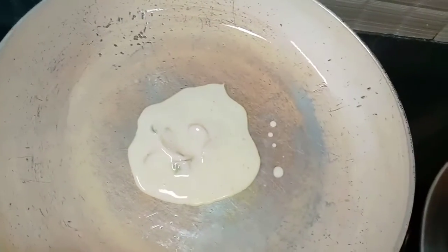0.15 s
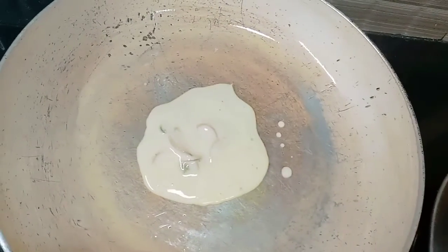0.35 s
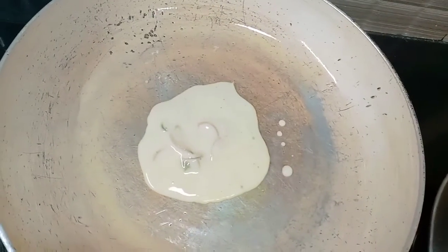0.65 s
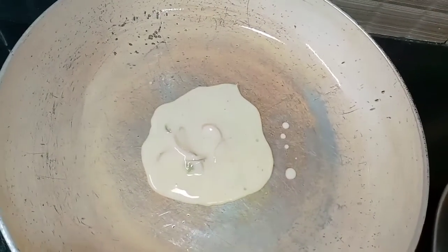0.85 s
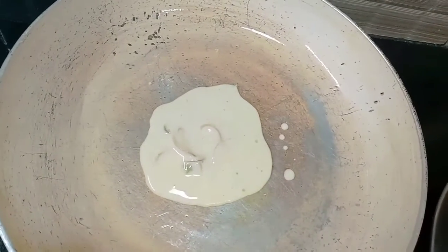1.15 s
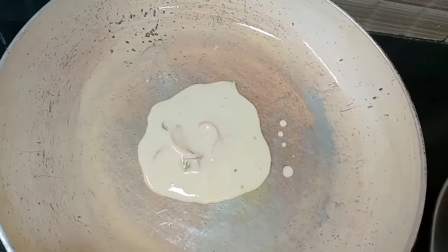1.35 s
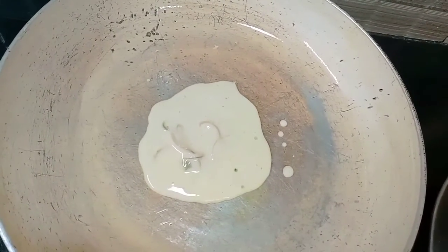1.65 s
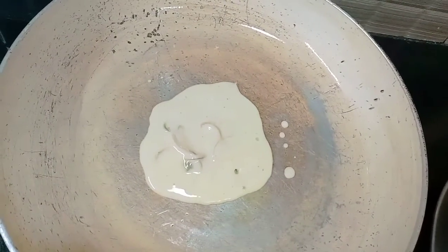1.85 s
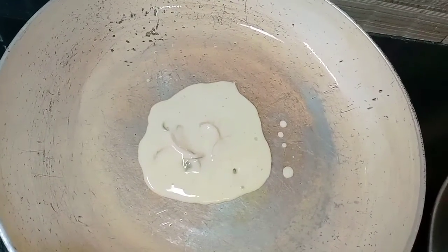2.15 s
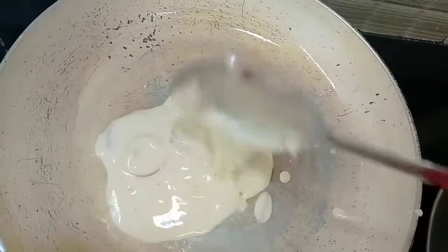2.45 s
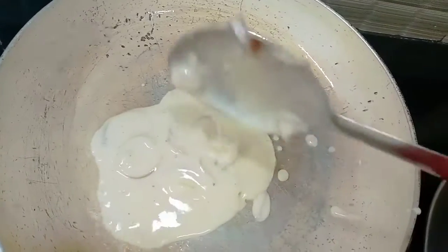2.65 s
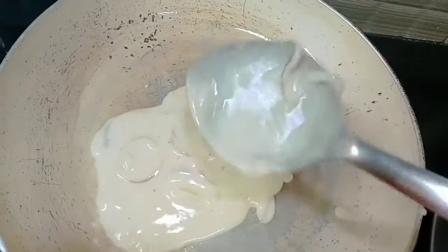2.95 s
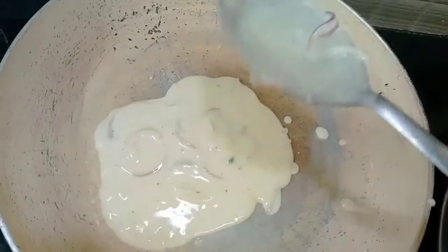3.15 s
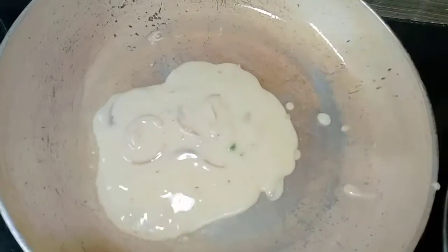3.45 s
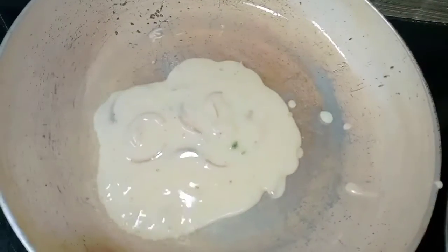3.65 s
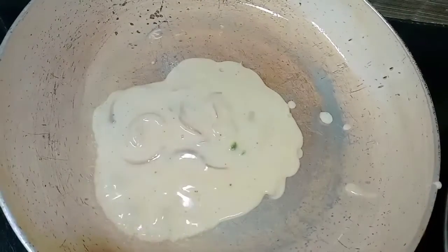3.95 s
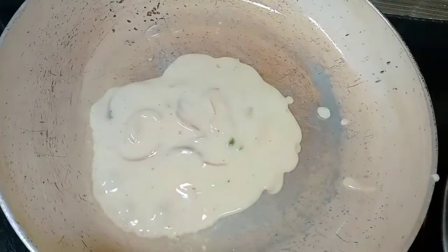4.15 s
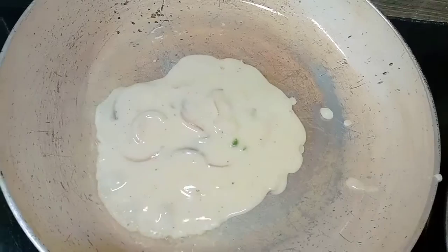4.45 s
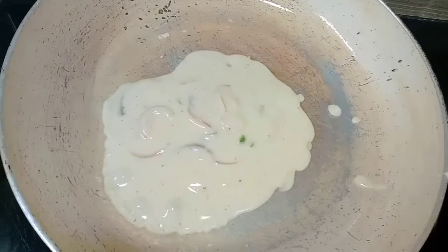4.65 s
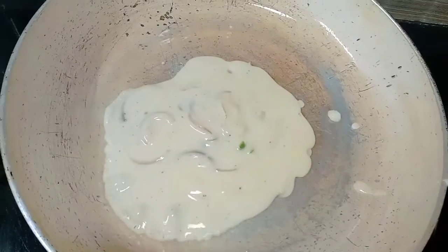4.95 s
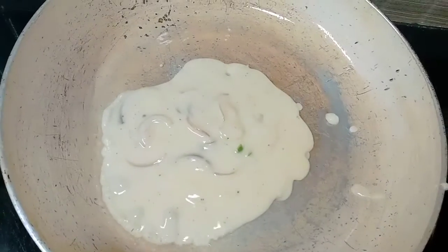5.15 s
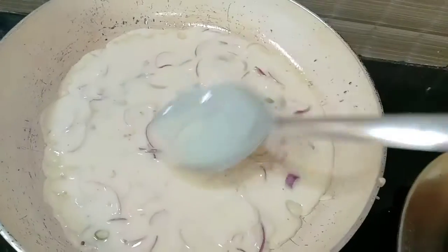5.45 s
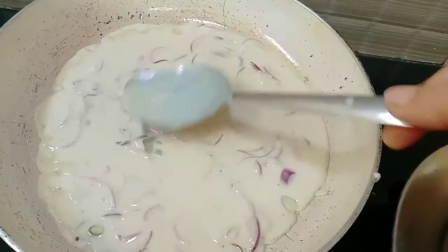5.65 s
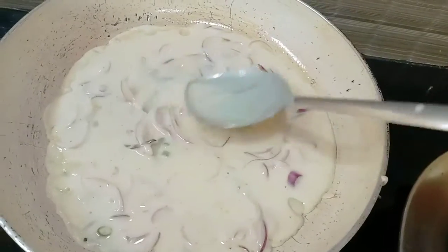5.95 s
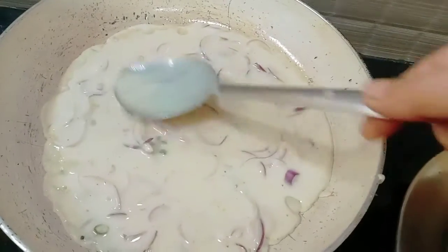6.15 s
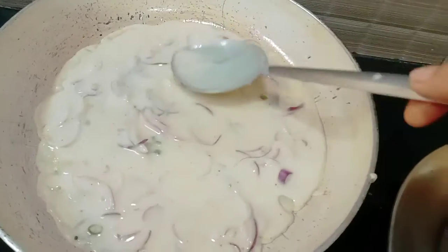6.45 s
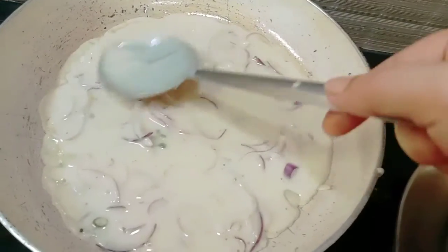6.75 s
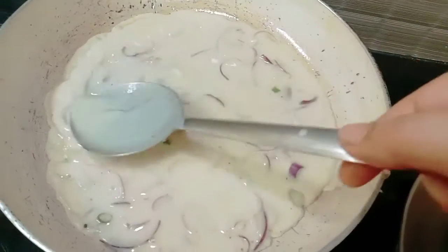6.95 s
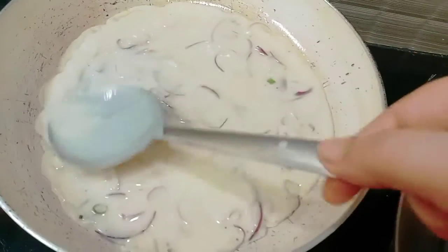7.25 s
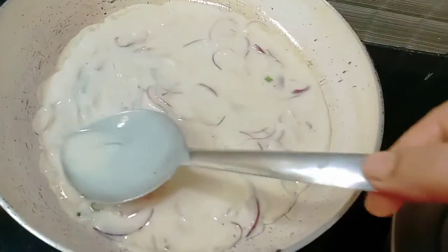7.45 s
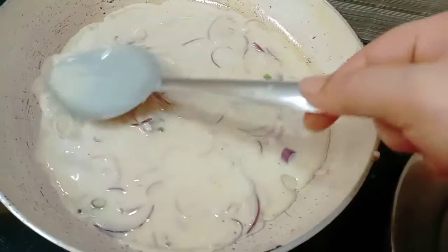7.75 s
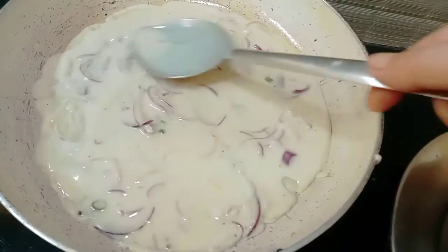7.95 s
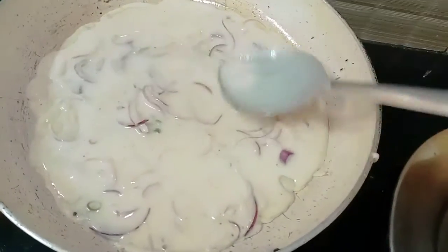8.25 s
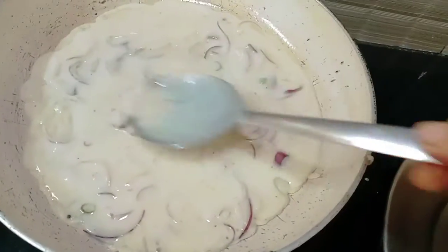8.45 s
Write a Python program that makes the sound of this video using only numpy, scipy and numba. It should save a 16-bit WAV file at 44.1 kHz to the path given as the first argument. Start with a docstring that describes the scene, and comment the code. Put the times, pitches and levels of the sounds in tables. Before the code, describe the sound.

Batter sizzles in a hot pan, a fresh spoonful flares up and fades, then a spoon softly spreads it with squelches and ticks.

```python
"""Batter sizzles in a hot frying pan, heard from close above in a small kitchen with a humming hob and fan.
The sizzle is thousands of short bursting bubbles over steam noise, coloured by the pan and the microphone.
A bowl rocks on the worktop, a second spoonful lands and flares up, and the steam slowly dies down.
After a brief near-silence a spoon spreads the batter: soft squelches, light ticks, a low rumble of
rubbing and fresh hiss where it reaches bare metal."""
import sys
import numpy as np
from scipy import signal
from scipy.fft import rfft, irfft, next_fast_len
from scipy.io import wavfile
from scipy.ndimage import uniform_filter1d
from numba import njit

SR = 44100
rng = np.random.default_rng(int(sys.argv[2]) if len(sys.argv) > 2 else 0)


def store_wav(level_fs):
    """Save 16-bit WAV to argv[1]."""
    pcm = np.round(np.clip(np.atleast_2d(level_fs), -1, 1) * 32767)
    wavfile.write(sys.argv[1], SR, pcm.T.astype(np.int16))


N = 379701
T = np.arange(N) / SR  # time in seconds

# The near-silence between pouring and spreading: start in seconds, end in seconds.
PAUSE = (5.335, 5.373)
TOP_HZ = 15550  # edge of the steep treble cut

# Kitchen air, a spectrum. Each row: frequency in Hz, gain in dB.
KITCHEN_COLOUR = [(30, -20), (55, -1.5), (75, -26), (110, 11), (170, 6.5), (260, 3.5), (360, 5.5),
                  (520, 3.5), (700, -4.5), (1000, -4), (1500, -3.5), (3000, -9.5), (7000, -39),
                  (14000, -23)]
# Mains hum of the hob, wavering about these levels.
# Each row: frequency in Hz, level while pouring in dB rms, level while spreading in dB rms.
MAINS_HUM = [(100, -67.5, -69), (198, -75, -70), (300, -69.5, -64.5)]
# Air resonances of the fan, fluttering about these levels.
# Each row: frequency in Hz, half-width in Hz, level while pouring and level while spreading in dB rms.
FAN_RESONANCES = [(101.7, 13, -69.5, -69.5), (421.7, 21, -68.5, -66.5), (785, 24, -74.5, -71),
                  (1247, 76, -63, -79)]
# A low tone near 423 Hz, set at these levels around these times. Each row: centre in seconds, level in dB rms.
LOW_TONE = [(0.1, -62), (0.283, -60), (0.45, -58.5), (0.63, -54.5), (1.62, -64), (2.04, -56.5), (3.1, -56),
            (3.38, -50), (3.88, -63), (4.15, -58), (4.98, -58.5), (5.29, -58), (5.48, -56), (6.8, -54.5),
            (7.97, -89)]
LOW_TONE_HZ, LOW_TONE_SPAN_S = 422.6, 0.049  # pitch, half-length around each time

# The bowl rocks to rest. Each row: start in seconds, level of the blow in dB before echoes.
BOWL_KNOCKS = [(1.035, -18.5), (1.046, -29.5), (1.0615, -29), (1.087, -34), (1.0987, -21), (1.127, -31),
               (1.1495, -28.5), (1.179, -41), (1.207, -43)]
# How the bowl rings. Each row: frequency in Hz, relative level in dB, t60 in seconds.
BOWL_MODES = [(225, -14, 0.023), (484, -5.5, 0.021), (620, -4.5, 0.065), (938, 10, 0.023),
              (1065, 4.5, .018), (1200, -4, 0.043), (1610, -6, 0.042), (2120, -0.5, 0.034),
              (2250, -1, 0.04), (2530, 0, 0.012), (2820, -10, 0.014), (3130, -11, 0.038), (3420, -17, .07)]
# How the room answers the bowl. Each row: frequency in Hz, gain in dB.
ROOM_COLOUR = [(900, -2.0), (2200, -5.0), (3300, 5)]

# Light touches of the spoon, dull through batter and bright on bare metal.
# Each row: start in seconds, level in dB before echoes, tilt in dB per octave.
SPOON_TICKS = [(5.507, -35, -15), (5.7661, -33, -4), (5.8544, -44, 3), (6.02, -34.5, -1),
               (6.396, -32.5, -4), (7.021, -33, 7), (7.166, -36, 1), (7.3432, -32.5, -14),
               (7.866, -22.5, 6), (7.9203, -22, 8)]
# How the spoon rings, damped by batter. Each row: frequency in Hz, relative level in dB, t60 in seconds.
SPOON_MODES = [(1290, 0, 0.011), (1830, 2.5, 0.0066), (2530, 8, 0.0079), (3600, 6.5, 0.012),
               (4800, 12, 0.0028), (7500, 5.5, 0.0051)]
# Small things radiate little bass. Each row: frequency in Hz, gain in dB.
SMALL_SOURCE_BASS = [(50, -30), (130, -0.5)]

# The rumble follows the pressure of the spoon. Each row: time in seconds, level in dB rms before flutter.
RUMBLE = [(5.38, -68), (5.6, -59), (6.1, -66), (6.3, -72), (6.5, -67), (6.7, -64), (7.1, -63), (7.45, -65),
          (7.8, -61), (8.15, -67), (8.6, -63)]
RUMBLE_FLUTTER_DB = 3.5
# Colour of the rubbing. Each row: frequency in Hz, gain in dB.
RUMBLE_COLOUR = [(70, -38), (140, -9.0), (190, 2.0), (260, 4.5), (340, -7.0), (480, -10.5),
                 (560, 0.5), (660, -7.5), (785, 5.5), (900, -17), (1400, -34)]

# Short clusters of bubbles: wet plops and, near 4 kHz, crackles of the frying.
# Each row: start in seconds, length in seconds, level of one bubble in dB before echoes, centre pitch in Hz.
BUBBLE_CLUSTERS = [(0.72, 0.031, -41, 1500), (0.722, 0.033, -46, 3000), (3.35, 0.033, -31, 4200),
                   (3.515, 0.014, -32, 4000), (3.73, 0.027, -31, 4200), (3.985, 0.036, -33, 4000),
                   (4.462, 0.017, -40, 2050), (4.474, 0.018, -45.5, 1310), (4.519, 0.033, -50, 1250),
                   (4.568, 0.0071, -39, 3020), (4.58, 0.04, -46, 2600), (6.947, 0.015, -49, 1400),
                   (7.262, 0.074, -52.5, 1350), (7.345, 0.053, -51, 1300)]
# Dull gulps of thick batter. Each row: start in seconds, peak level in dB before echoes, pitch in Hz.
GULPS = [(0.775, -56, 189), (2.331, -50, 225), (2.368, -56, 144), (2.468, -50, 151), (2.521, -57, 228),
         (3.308, -49, 268), (4.478, -52, 337), (4.483, -56, 900), (4.52, -45, 950), (4.542, -44, 890),
         (5.431, -68, 215), (5.575, -61, 150), (5.621, -62, 267), (5.72, -53, 300), (6.079, -58, 308),
         (6.135, -60, 430), (6.17, -62, 150), (6.75, -59, 248), (6.921, -56, 435), (7.469, -58, 348),
         (7.81, -55.5, 190)]

# Droplets that spit. Each row: start in seconds, level in dB before echoes.
SPITS = [(0.735, -26), (0.7657, -24), (0.9014, -20.5), (1.2161, -28), (1.3614, -24), (1.5818, -19.5),
         (4.2054, -23.5), (4.407, -25), (4.6134, -25), (5.1574, -35), (5.279, -20), (6.745, -34),
         (6.8907, -31), (6.9044, -40), (7.1656, -32.5), (7.8662, -25), (7.9035, -37)]
# The bright snap of a droplet. Each row: frequency in Hz, relative level in dB, t60 in seconds.
SPIT_MODES = [(3800, 3, 0.00082), (5430, -5, 0.0056), (7600, 4.0, 0.0038),
              (8500, 4.5, 0.007), (11000, -1, 0.0033), (14900, -3, 0.0036)]

# Blubbering under the fresh spoonful, a first rush and a lingering rest.
# Each holds: steady time in seconds, level in dB, fade in dB per second.
BLUBBER_RUSH, BLUBBER_REST = (0.2, -43.5, 46), (0.73, -58, 4.7)
# Colour of the big steam bubbles. Each row: frequency in Hz, gain in dB.
BLUBBER_COLOUR = [(50, -45), (110, -1), (160, 0.0), (280, -6.5), (400, 11.0),
                  (520, 5.5), (640, -1.0), (780, 6), (1100, 5)]
# Bass cut on the ringing air of the rush. Each row: frequency in Hz, gain in dB.
BLUBBER_RING_COLOUR = [(100, -41.5), (900, 0)]

# Two bands of hiss that climb.
# Each row: time in seconds, upper band in Hz, its level in dB rms, lower band in Hz, its level in dB rms.
CLIMBS = [(4.85, 3300, -64, 2400, -66), (4.93, 4400, -44, 2800, -57), (4.98, 5250, -43, 3050, -50),
          (5.06, 6300, -50, 3450, -51), (5.16, 7200, -51, 4200, -43), (5.25, 7400, -66, 4430, -47),
          (5.33, 7500, -70, 4660, -44)]
CLIMB_WIDTH_HZ = 940  # half-width

# Spoonfuls boil steadily, then dry out, large wet bubbles first and fine spray last.
# Each row: start in seconds, steady time in seconds, sizzle in dB, wet bubbles in dB relative to it,
# spray in dB relative to it, then the fades of these three in dB per second.
SPOONFULS = [(-0.03, 0.027, -42.5, -3, 4.6, 3.86, 5.5, 3.94),
             (2.249, 0.76, -33.5, -1.5, 0.19, 4.1, 7.8, 3.15)]
# Steam escapes from under the edge of the batter. Each row: start in seconds, length in seconds,
# sizzle in dB, wet bubbles in dB relative to it, spray in dB relative to it.
FLARES = [(-0.02, 0.45, -39.5, -6, -5), (0.712, 0.05, -43, -10, -5), (2.267, 0.64, -47, 8, -15),
          (3.339, 0.041, -35.5, -5, -20), (3.444, 0.027, -39.5, -16, -10), (3.513, 0.012, -32, -10, -9),
          (3.716, 0.034, -37.5, -5, -18), (3.901, 0.03, -36.5, -1, -11), (3.975, 0.084, -38.5, -2.5, -15),
          (4.177, 0.066, -42, 0, -13), (4.56, 0.029, -43, -12, -12), (4.9, 0.23, -51, -25, 9),
          (5.138, 0.24, -42.5, -11, 3.5)]
FLARE_ATTACK_S, FLARE_RELEASE_DB_PER_S = 0.012, 237
# Strokes of the spoon, wet in thick batter and hissing on bare metal.
# Each row: start in seconds, attack in seconds, length in seconds,
# sizzle in dB, wet bubbles in dB relative to it, spray in dB relative to it.
STROKES = [(5.45, 0.061, 0.064, -68, 13.5, -7), (5.547, 0.03, 0.056, -68, 10, -3),
           (5.613, 0.023, 0.25, -61, 6, -13), (5.904, 0.038, 0.2, -62.5, 5.5, -7.5),
           (6.215, 0.039, 0.03, -79.5, 21.5, -2), (6.33, 0.028, 0.051, -55, 4.5, -7),
           (6.506, 0.057, 0.11, -48.5, -6, -1), (6.62, 0.023, 0.13, -52, -2.5, -5.5),
           (6.76, 0.04, 0.092, -56.5, 2, -1), (6.85, 0.03, 0.082, -52.5, -6, -5),
           (6.935, 0.021, 0.19, -52.5, -0.5, -8), (7.13, 0.04, 0.13, -58.5, -7, -7.5),
           (7.161, 0.004, 0.018, -55, -4, -7), (7.232, 0.026, 0.055, -52.5, -0.5, -5.5),
           (7.312, 0.023, 0.1, -54.5, -7, -10), (7.468, 0.046, 0.31, -53, -8, -7),
           (7.742, 0.1, 0.84, -45, -9, 0), (7.903, 0.018, 0.031, -45, -2, -1),
           (7.92, 0.06, 0.34, -52.5, 1, -7)]
STROKE_RELEASE_DB_PER_S, STROKE_FLUTTER_DB = 183, -0.5
SAG_DB_PER_S = 3.5  # a flare or a stroke weakens as the metal under it cools
# The spread batter between strokes: sizzle in dB, wet bubbles and spray in dB relative to it.
SIMMER = (-70, -0.56, -6)

# Broad colour of the frying as picked up, with a microphone resonance above 14 kHz.
# Each row: frequency in Hz, gain in dB.
PICKED_UP_COLOUR = [(200, -25), (620, -11), (850, -1.5), (1400, 2), (2500, 2.5), (5500, 0.5), (7400, -1),
                    (8300, -2), (10500, -5.5), (12500, -8), (13800, -15), (14600, -1), (15500, -2)]
# Peaks and hollows of the air in the pan. Each row: frequency in Hz, half-width in Hz, gain in dB.
PAN_AIR = [(1040, 144, -3.5), (1266.5, 25, 7.5), (1524, 150, 5.5), (1700, 72, -4), (2070, 130, 1),
           (1964, 77, -4), (2395, 230, -6), (3150, 76, 1), (4683, 66, 3), (5520, 1100, 2), (5870, 260, 2),
           (6260, 160, -7), (7560, 160, 1), (8030, 480, -5.5)]
# The same around the first small pool. Each row: frequency in Hz, half-width in Hz, gain in dB.
SMALL_POOL_AIR = [(650, 220, -4), (2140, 240, -0.5), (2480, 52, 2), (3750, 160, -4), (4800, 250, -2.5),
                  (5340, 110, 3), (6600, 690, -3.5), (7740, 270, 4)]
# And around the widely spread batter. Each row: frequency in Hz, half-width in Hz, gain in dB.
SPREAD_AIR = [(1484, 170, -7), (1960, 92, 6.5), (2310, 180, 3), (3100, 180, -3), (5640, 1400, -2.5),
              (7300, 530, 2.5), (9900, 600, -1), (12000, 740, -3.5), (960, 35, -9)]
# Bands used to gauge each bubble size: wet, middling, fine, mist. Each row: low edge in Hz, high edge in Hz.
SIZE_RANGES = [(900, 2400), (2700, 6200), (6800, 11000), (6800, 11000)]
# The corners in Hz between which one bubble size hands over to the next.
SIZE_CORNERS_HZ = [1900, 3100, 5800, 7400, 10500, 13000]
# Each row: the share of one bubble size at each of those corners, from 0 to 1.
SIZE_SHARES = [(1, 0, 0, 0, 0, 0), (0, 1, 1, 0, 0, 0), (0, 0, 0, 1, 1, 0), (0, 0, 0, 0, 0, 1)]

# The echo from the hand or spoon above the pan.
# Each row: time in seconds, lowest hollow in Hz, echo share from 0 to 1.
OVERHEAD_ECHO = [(4.6, 1520, 0.69), (4.85, 1510, 0.48), (4.93, 1670, 0.69), (5.0, 2090, 0.53),
                 (5.1, 2650, 0.54), (5.2, 2900, 1), (5.33, 3100, 1), (5.38, 1050, .1), (6.1, 994, 0.68),
                 (6.4, 1710, 0.16), (6.55, 2150, .2), (6.95, 2220, 0.33), (7.3, 1610, 0.11),
                 (7.55, 3130, 0.61), (7.85, 3200, 0.42), (8.05, 1610, 0.14), (8.25, 1580, 0.21),
                 (8.6, 1660, .22)]
# Colour of that echo. Each row: frequency in Hz, gain in dB.
OVERHEAD_COLOUR = [(900, -15), (1800, -2.0), (6200, -14.5), (9000, -33)]
# The air between spoon and pan rings, lower as the gap widens.
# Each row: time in seconds, centre in Hz, boost in dB.
GAP_RING = [(5.38, 3300, -2), (5.55, 3350, 9), (5.68, 3520, 8.5), (6.15, 3450, 11), (6.3, 3500, -1),
            (6.48, 3850, 4), (6.56, 3850, 5.5), (7.0, 3820, 3), (7.4, 3750, 1), (7.55, 4300, 1),
            (7.8, 4580, 6), (7.93, 4350, 8), (8.05, 3900, 7), (8.18, 3450, 3), (8.35, 3300, -1)]
# A lower band that stands out of the scrape. Each row: time in seconds, centre in Hz, boost in dB.
LOW_RING = [(5.38, 2100, 0), (5.7, 2100, 5), (6.2, 2120, 2.5), (6.39, 2560, 6), (6.56, 2800, 9),
            (6.9, 2900, 4.5), (7.2, 2800, -2), (7.32, 2370, 2), (7.6, 2700, -2), (8.0, 2580, 3.5),
            (8.38, 2530, 7.5), (8.6, 2500, -6)]
# A gliding band of the frying sound, weakened or strengthened.
# Each row: time in seconds, centre in Hz, boost in dB.
GLIDING_BAND = [(0.4, 2100, -3.5), (0.9, 2100, -4), (1.7, 2080, -2.5), (2.24, 2110, -4), (2.3, 2080, -2),
                (3.3, 2110, -1.5), (4.0, 2110, 3.5), (4.85, 2900, -4.5), (4.97, 4000, -9), (5.1, 5930, -4),
                (5.33, 6500, -6), (5.38, 2600, 2), (5.5, 2500, -4), (6.1, 2500, 1), (6.4, 2250, -9),
                (6.55, 2260, -5), (6.9, 2200, -7), (7.22, 2180, -13), (7.31, 1900, -1), (7.55, 1700, -3),
                (7.9, 1650, -8), (8.1, 1650, -1)]
# A ring near 1250 Hz in the sizzle that grows and fades.
# Each row: time in seconds, centre in Hz, boost in dB.
SIZZLE_RING = [(0, 1220, 3), (2.3, 1260, 0), (3.3, 1270, 0), (4.6, 1240, 5.5), (5.0, 1190, -13),
               (5.33, 1180, -1), (5.4, 1260, 4), (6.5, 1260, 1), (6.65, 1250, 6.5), (7.0, 1230, 4.5),
               (7.33, 1210, 8.5), (7.5, 1250, 7), (7.8, 1270, 0), (7.95, 1290, 0), (8.45, 1270, 3.5)]
GAP_WIDTH_HZ, LOW_WIDTH_HZ, GLIDING_WIDTH_HZ, SIZZLE_RING_WIDTH_HZ = 240, 280, 590, 73


def undb(db):
    """Decibels to gain."""
    return 10 ** (np.asarray(db) / 20)


def level(x, db):
    """Bring a sound to unit rms, then to a level in dB that may move."""
    return x * undb(db) / np.sqrt(np.mean(x ** 2))


def curves(rows):
    """The columns of a table, joined by straight lines in time."""
    s, *columns = np.transpose(rows)
    return [np.interp(T, s, column) for column in columns]


def shape(x, gain):
    """Filter by a gain that is a function of frequency."""
    size = next_fast_len(N + 4096)
    hz = np.arange(size // 2 + 1) * SR / size + 1  # 1 Hz up, to keep its logarithm finite
    return irfft(rfft(x, size) * gain(hz), size)[:N]


def slope(hz, points):
    """A (Hz, dB) spectrum read on a log-frequency axis."""
    f, db = np.transpose(points)
    return np.interp(np.log(hz), np.log(f), db)


def slope_gain(hz, points):
    """The gain of a (Hz, dB) spectrum."""
    return undb(slope(hz, points))


def bumps_db(hz, bumps):
    """Rounded peaks and hollows along the frequency axis."""
    return sum(db * np.exp(-((hz - f) / width) ** 2) for f, width, db in bumps)


def noise_band(hz, width_hz):
    """Noise in a rounded band about one frequency."""
    return shape(rng.standard_normal(N), lambda f: np.exp(-((f - hz) / width_hz) ** 2))


def walk(rate):
    """A smooth random wander: levels held 1 / rate seconds and slewed twice; spread near 1."""
    hold = int(SR / rate)
    steps = rng.standard_normal(1024)
    held = steps[np.arange(N) // hold % len(steps)]
    return 1.3 * uniform_filter1d(uniform_filter1d(held, hold), hold)


def delayed(x, s):
    """The sound s seconds later; s may move."""
    return np.interp(T - s, T, x)


def envelope(start, length, attack, release_db, sag_db=0):
    """A quick rise, a hold that sags and a release; both slopes in dB per second."""
    age = np.maximum(T - start, 0)
    fall_db = sag_db * np.minimum(age, length) + release_db * np.maximum(age - length, 0)
    return np.minimum(age / attack, 1) * undb(-fall_db)


@njit
def ring(start, hz, t60, size):
    """A sum of decaying sines, each with its own start, pitch, decay and size."""
    out = np.zeros(N)
    for k in range(len(start)):
        z, p = size[k] + 0j, np.exp((2j * np.pi * hz[k] - np.log(1000) / t60[k]) / SR)
        first = int(start[k] * SR)
        for i in range(first, min(N, first + int(t60[k] * SR) + 2)):
            z *= p
            out[i] += z.imag
    return out


def bubbles(rate, lo_hz, hi_hz, cycles, spread_db):
    """Bubbles burst at random, each a few cycles long; small ones snap harder, so the sum is near white."""
    chance, pitch, size = rng.random(N), rng.random(N), rng.standard_normal(N)
    at = chance < rate / SR
    hz = lo_hz * (hi_hz / lo_hz) ** pitch[at]
    # dense bubbling is made of weaker bubbles, so the rate alone does not set the level
    size = undb(spread_db * np.minimum(size[at], 2)) * hz / np.sqrt((rate + 0 * T)[at])
    sign = np.where(np.flatnonzero(at) % 2, 1, -1)
    return level(ring(T[at], hz, cycles / hz, size * sign), 0)


def strike(events, modes, scatter, tilt_db=0):
    """Every blow rings all modes of one object, slightly retuned; tilt (dB per octave) brightens it."""
    (s, db, *_), (hz, mode_db, t60) = np.transpose(events), np.transpose(modes)
    share = undb(mode_db + np.outer(tilt_db, np.log2(hz)))
    share = share / np.linalg.norm(share, axis=1, keepdims=True)
    share = share * (-1) ** np.arange(len(hz))  # neighbouring modes start in opposite directions
    pitch = hz * (1 + scatter * rng.standard_normal((len(s), len(hz))))
    size = undb(db)[:, None] * share
    return ring(np.repeat(s, len(hz)), pitch.ravel(), np.tile(t60, len(s)), size.ravel())


def echoes(x, t60, wet_db):
    """Dense reflections that begin after a millisecond and die away."""
    t = T[:SR // 2]
    tail = rng.standard_normal(len(t)) * np.exp(-np.log(1000) * t / t60) * (t > .001)
    return x + undb(wet_db) * signal.fftconvolve(x, tail / np.linalg.norm(tail))[:N]


def kitchen_air():
    """The dull background of the kitchen: shaped noise whose level drifts."""
    air = shape(rng.standard_normal(N), lambda hz: slope_gain(hz, KITCHEN_COLOUR))
    return level(air, -62.5) * undb(walk(5))


def hob_hum():
    """Mains hum: a few steady sines that waver in level and phase."""
    out = 0
    for hz, pouring_db, spreading_db in MAINS_HUM:
        db = np.where(T < PAUSE[0], pouring_db, spreading_db) + 3 * walk(14)
        out = out + undb(db) * np.sqrt(2) * np.sin(2 * np.pi * hz * T + .6 * walk(12))
    return out


def fan():
    """Air noise in narrow resonances whose levels flutter."""
    out = 0
    for hz, width_hz, pouring_db, spreading_db in FAN_RESONANCES:
        db = np.where(T < PAUSE[0], pouring_db, spreading_db) + 2.44 * walk(13)
        out = out + level(noise_band(hz, width_hz), db)
    return out


def low_tone():
    """A low tone near 423 Hz, a sine of wandering phase set at given levels around given times."""
    strength = sum(undb(db) * np.exp(-((T - s) / LOW_TONE_SPAN_S) ** 2) for s, db in LOW_TONE)
    return strength * np.sqrt(2) * np.sin(2 * np.pi * LOW_TONE_HZ * T + walk(17))


def bowl():
    """The bowl stands further off: its modes ring, echo from the worktop and wake the room."""
    tilt_db = 0.3 * (np.transpose(BOWL_KNOCKS)[1] + 22.5)  # weak knocks are duller
    knock = strike(BOWL_KNOCKS, BOWL_MODES, scatter=0.024, tilt_db=tilt_db)
    knock = knock + 0.24 * delayed(knock, 0.00225)
    reflections = echoes(knock, t60=0.39, wet_db=-0.5) - knock
    return knock + shape(reflections, lambda hz: slope_gain(hz, ROOM_COLOUR))


def spoon_ticks():
    """The spoon ticks close by: short damped modes, brighter where it meets bare metal."""
    ticks = strike(SPOON_TICKS, SPOON_MODES, scatter=0.028, tilt_db=np.transpose(SPOON_TICKS)[2])
    return echoes(ticks, t60=0.092, wet_db=-1.5)


def stirring():
    """The back of the spoon rubs through the batter with a low, fluttering rumble of slow bubbles."""
    rub = bubbles(900, 127, 825, cycles=9.4, spread_db=4.0)
    rub = shape(rub, lambda hz: slope_gain(hz, RUMBLE_COLOUR))
    pressure_db = curves(RUMBLE)[0] + RUMBLE_FLUTTER_DB * walk(22)
    return level(rub, pressure_db) * (T > PAUSE[0])


def clusters_and_gulps(count=24):
    """Quick clusters of short decaying sines for plops and crackles, one longer low sine for each gulp."""
    s, length, db, hz = np.repeat(BUBBLE_CLUSTERS, count, axis=0).T
    late, pitch = rng.random((len(s), 2)).T
    hz = hz * 2 ** (1.2 * (pitch - .5))
    clusters = ring(s + length * late, hz, 7 / hz, undb(db))
    s, db, hz = np.transpose(GULPS).copy()
    gulps = ring(s, hz, 20 / hz, undb(db))
    return echoes(clusters, t60=0.084, wet_db=1.0) + echoes(gulps, t60=0.033, wet_db=11.5)


def spits():
    """Single droplets burst with a bright snap of very short modes."""
    return echoes(strike(SPITS, SPIT_MODES, scatter=0.071), t60=0.087, wet_db=-0.5)


def blubber():
    """Big steam bubbles push through the fresh spoonful and thin out; the rush rings the air in the pan."""
    lands = SPOONFULS[-1][0]
    rush, rest = (undb(db) * envelope(lands, hold, attack=0.037, release_db=fade)
                  for hold, db, fade in (BLUBBER_RUSH, BLUBBER_REST))
    big = bubbles(500, 143, 1010, cycles=19.5, spread_db=2.5)
    big = shape(big, lambda hz: slope_gain(hz, BLUBBER_COLOUR))
    ringing = bubbles(400, 1263, 1305, cycles=50, spread_db=3.5)
    ringing = shape(ringing, lambda hz: slope_gain(hz, BLUBBER_RING_COLOUR))
    return level(big, -0.3) * (rush + rest) + undb(6.0) * ringing * rush


def climbing_hiss():
    """Two narrow bands of hiss climb in pitch together: slow noise carried on gliding sines."""
    upper_hz, upper_db, lower_hz, lower_db = curves(CLIMBS)
    out = 0
    for hz, db in ((upper_hz, upper_db), (lower_hz, lower_db)):
        noise = level(noise_band(0, CLIMB_WIDTH_HZ), 0)
        out = out + undb(db) * noise * np.sqrt(2) * np.sin(2 * np.pi * np.cumsum(hz) / SR)
    return out * (T > CLIMBS[0][0]) * (T < PAUSE[0])


def boiling():
    """Spoonfuls, flares and strokes add their power: sizzle in dB, wet bubbles and spray relative to it."""
    def power(db, wet_db, spray_db):
        """Power of the sizzle, the wet bubbles and the spray, one row each."""
        return undb(db + np.array([[0], [wet_db], [spray_db]])) ** 2
    poured, flares, strokes = 0, 0, 0
    for s, hold, db, wet_db, spray_db, *fades in SPOONFULS:
        drying = np.array([envelope(s, hold, attack=0.0071, release_db=fade) for fade in fades])
        poured = poured + power(db, wet_db, spray_db) * drying ** 2
    for s, length, db, wet_db, spray_db in FLARES:
        burst = envelope(s, length, FLARE_ATTACK_S, FLARE_RELEASE_DB_PER_S, SAG_DB_PER_S)
        flares = flares + power(db, wet_db, spray_db) * burst ** 2
    for s, attack, length, db, wet_db, spray_db in STROKES:
        burst = envelope(s, length, attack, STROKE_RELEASE_DB_PER_S, SAG_DB_PER_S)
        strokes = strokes + power(db, wet_db, spray_db) * burst ** 2
    strokes = strokes * undb(STROKE_FLUTTER_DB * walk(30)) ** 2
    total = np.where(T < np.mean(PAUSE), poured + flares, power(*SIMMER) + strokes)
    db, wet, spray = 10 * np.log10(total)
    return db, wet - db, spray - db


def wandering_spots(rate, spread_db, wander_db, count=4):
    """Patches of the pan boil in turn and creep about, so their echoes from the rim colour them differently."""
    out = 0
    for _ in range(count):
        steam = undb(-2.0) * rng.standard_normal(N)
        spot = bubbles(rate / count, 440, 16900, cycles=4.2, spread_db=3.5) + steam
        near_s, far_s = .0007 + .00015 * walk(5), .0022 + .0003 * walk(4)
        spot = spot + .5 * delayed(spot, near_s)
        spot = spot - .5 * delayed(spot, far_s)
        out = out + spot * undb(wander_db * walk(5) + spread_db * walk(90))
    # the heat that the patches share stays the same
    return out / np.sqrt(uniform_filter1d(out ** 2, size=4096))


def pickup_gain(hz):
    """The broad colour of the frying as picked up, with the peaks and hollows of the pan."""
    return undb(slope(hz, PICKED_UP_COLOUR) + bumps_db(hz, PAN_AIR))


def pool_colour(x):
    """The first small pool and the widely spread batter each have a colour of their own."""
    small, spread = (shape(x, lambda hz: undb(bumps_db(hz, air))) for air in (SMALL_POOL_AIR, SPREAD_AIR))
    return np.select([T < SPOONFULS[-1][0], T > np.mean(PAUSE)], [small, spread], x)


def passing_reflection(x):
    """A hand or spoon over the pan sends back a dull echo; the closer it comes, the higher the hollows."""
    hollow_hz, share = curves(OVERHEAD_ECHO)
    dull = shape(x, lambda hz: slope_gain(hz, OVERHEAD_COLOUR))
    return (x - share * delayed(dull, 1 / hollow_hz)) * undb(-2.5 * share)


def moving_bands(x):
    """Four narrow bands of the frying sound are weakened or strengthened as their centres glide."""
    for rows, width_hz in ((GAP_RING, GAP_WIDTH_HZ), (LOW_RING, LOW_WIDTH_HZ),
                           (GLIDING_BAND, GLIDING_WIDTH_HZ), (SIZZLE_RING, SIZZLE_RING_WIDTH_HZ)):
        hz, boost_db = curves(rows)
        turn, pole = np.exp(2j * np.pi * np.cumsum(hz) / SR), np.exp(-np.pi * width_hz / SR)
        # shift the gliding centre down to 0 Hz, smooth there, and shift it back
        slow = signal.lfilter([1 - pole], [1, -pole], x * turn.conj())
        band = 2 * np.real(turn * slow)
        x = x + (undb(boost_db) - 1) * band
    return x


def sizzle():
    """Bursting bubbles over a hiss of steam: sparse crackles when quiet, a dense rush when loud."""
    db, wet_db, spray_db = boiling()
    rate = np.minimum(2500 + 5500 * undb(.8 * (db + 45)), SR / 2)  # bubbles per second
    # the quieter the pan, the more a single patch stands out
    fry = wandering_spots(rate, spread_db=0.96, wander_db=np.interp(db, [-52, -36], [8, 3]))
    fry = shape(echoes(fry, t60=0.12, wet_db=-12.5), pickup_gain)
    # large, middling and fine bubbles each fill their own range of pitch
    large_db = db + wet_db - .2 + 1.5 * walk(30)
    middling_db = db + 0.63 + 0.21 * walk(30)
    fine_db = db + spray_db + 0.082
    # the finest mist needs a fierce boil
    mist_db = db + spray_db + np.interp(db, [-50, -37], [-2.5, .5])
    corners = np.log(SIZE_CORNERS_HZ)
    out = 0
    for (lo, hi), share, size_db in zip(SIZE_RANGES, SIZE_SHARES, (large_db, middling_db, fine_db, mist_db)):
        strength = np.std(shape(fry, lambda hz: (hz > lo) & (hz < hi)))
        part = shape(fry, lambda hz: np.interp(np.log(hz), corners, share))
        out = out + undb(size_db) / strength * part
    return out


def scene():
    """Everything is heard from one point close above the pan, the same in both channels."""
    background = kitchen_air() + hob_hum() + fan() + low_tone()
    small_sources = bowl() + spoon_ticks() + clusters_and_gulps()
    small_sources = shape(small_sources, lambda hz: slope_gain(hz, SMALL_SOURCE_BASS))
    batter = stirring() + spits() + blubber() + climbing_hiss()
    frying = moving_bands(passing_reflection(pool_colour(sizzle())))
    mono = background + small_sources + batter + frying
    return np.array([mono, mono])


def record(dry):
    """A brief near-silence parts the pouring from the spreading; the top is cut steeply."""
    gate = np.where((T > PAUSE[0]) & (T < PAUSE[1]), .01, 1)
    gate = uniform_filter1d(gate, 256)  # soft edges
    treble_cut = signal.ellip(12, .2, 80, TOP_HZ, fs=SR, output="sos")
    return signal.sosfilt(treble_cut, dry * gate)


dry = scene()
out = record(dry)
store_wav(out)
```